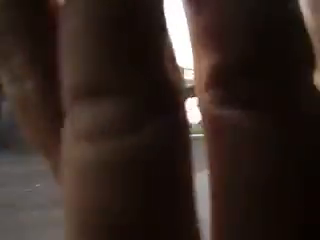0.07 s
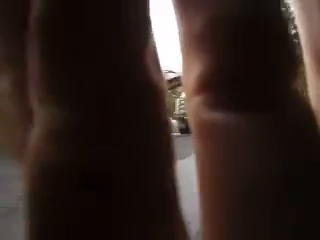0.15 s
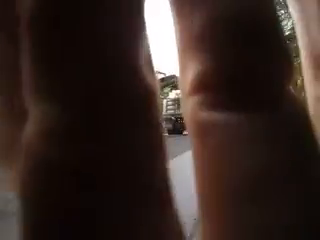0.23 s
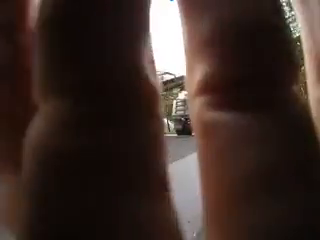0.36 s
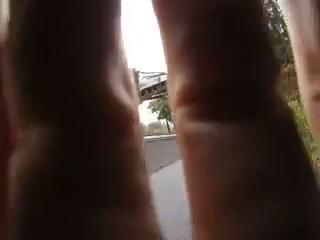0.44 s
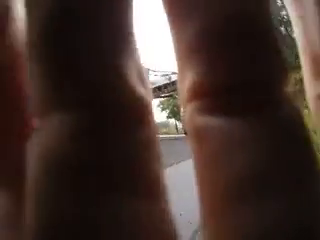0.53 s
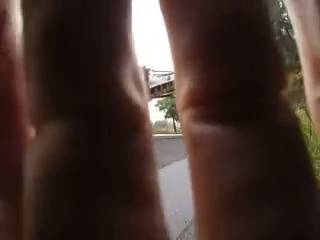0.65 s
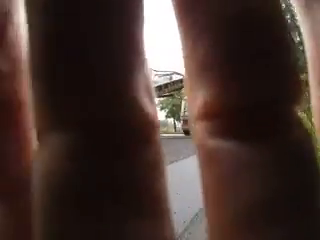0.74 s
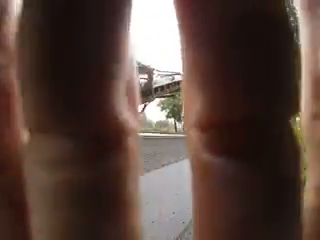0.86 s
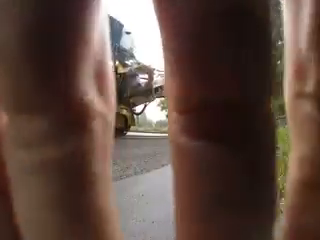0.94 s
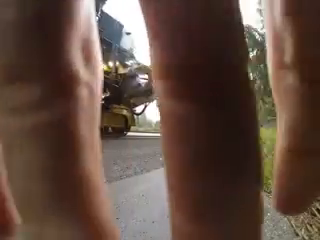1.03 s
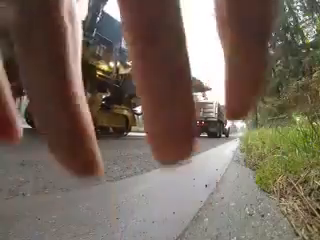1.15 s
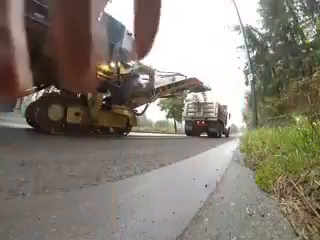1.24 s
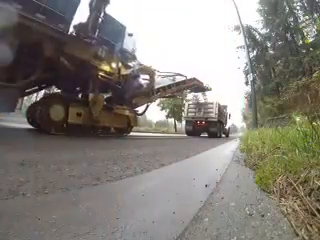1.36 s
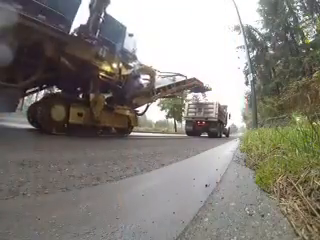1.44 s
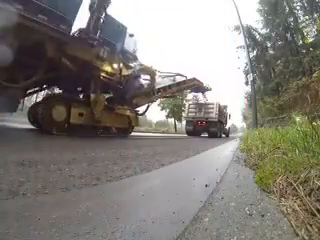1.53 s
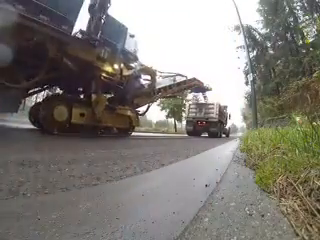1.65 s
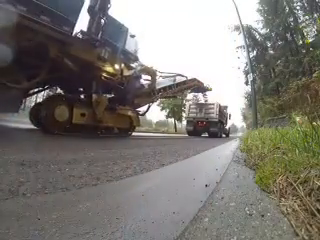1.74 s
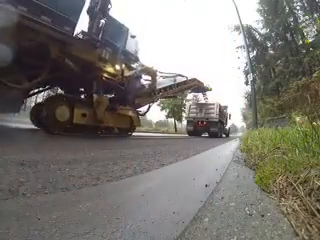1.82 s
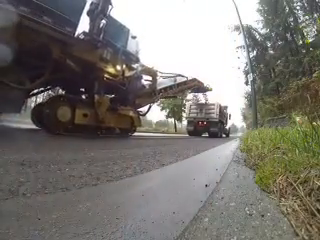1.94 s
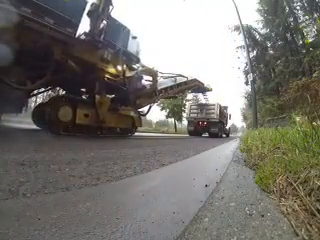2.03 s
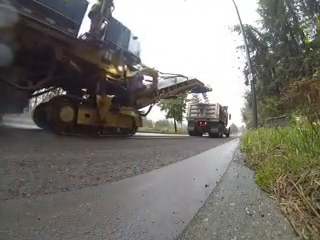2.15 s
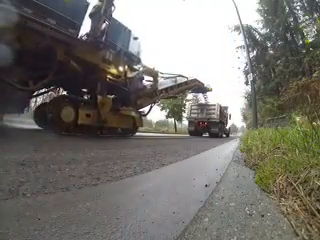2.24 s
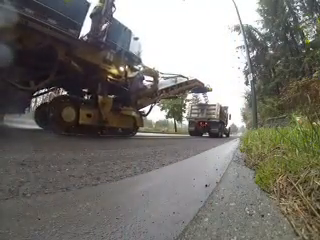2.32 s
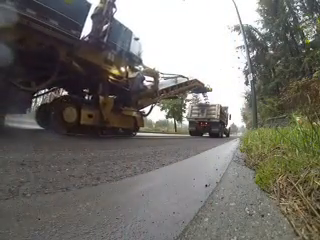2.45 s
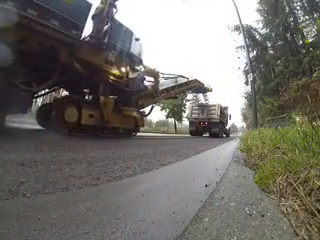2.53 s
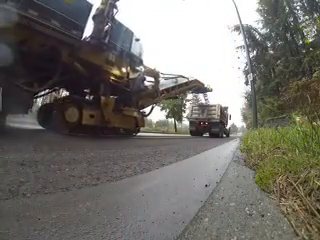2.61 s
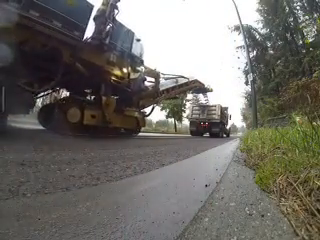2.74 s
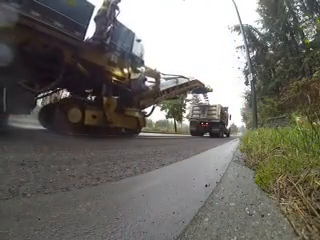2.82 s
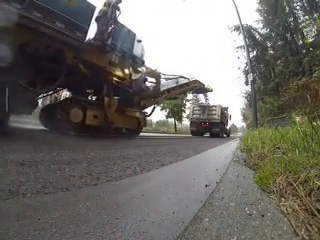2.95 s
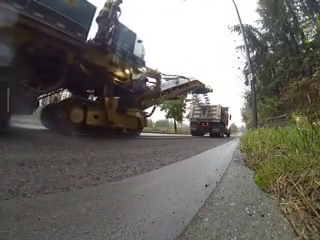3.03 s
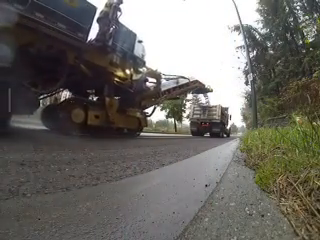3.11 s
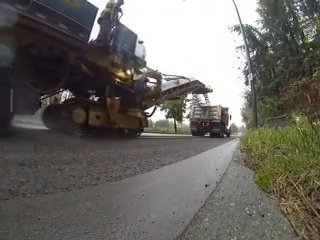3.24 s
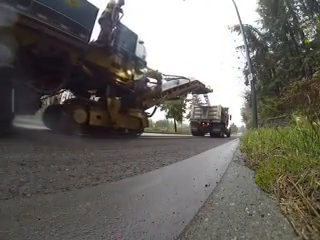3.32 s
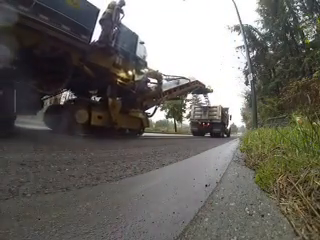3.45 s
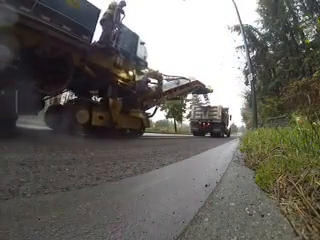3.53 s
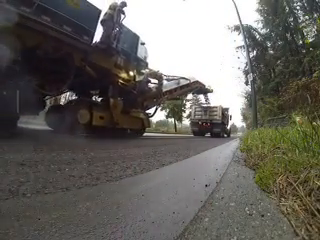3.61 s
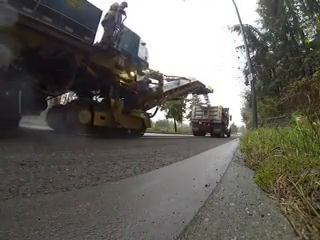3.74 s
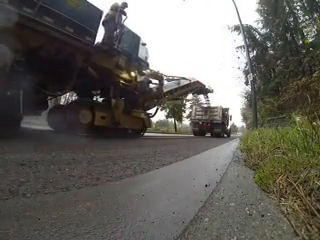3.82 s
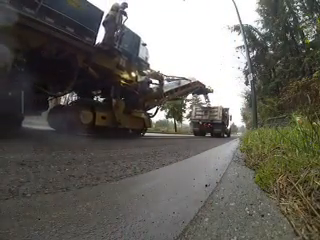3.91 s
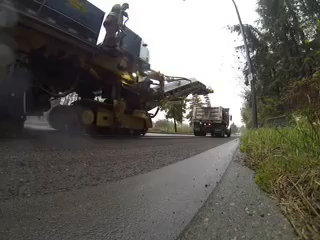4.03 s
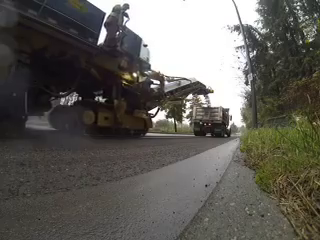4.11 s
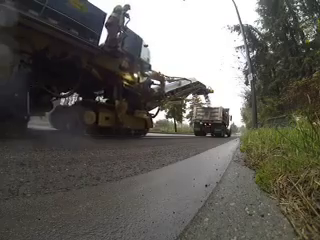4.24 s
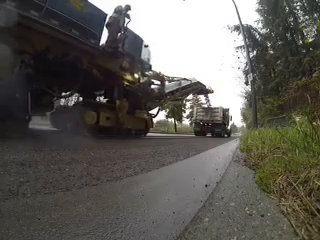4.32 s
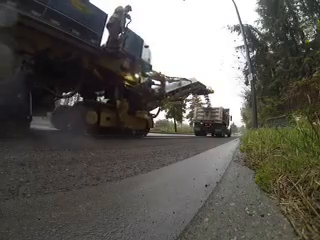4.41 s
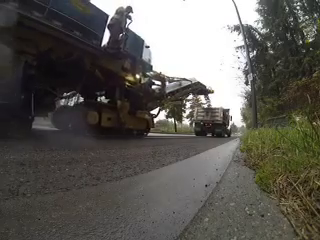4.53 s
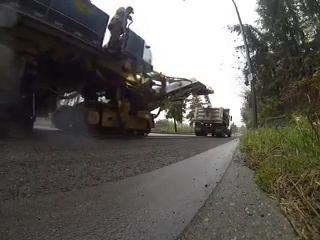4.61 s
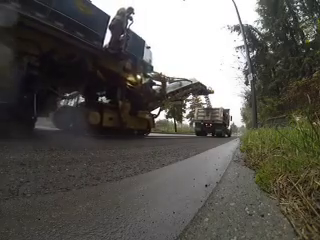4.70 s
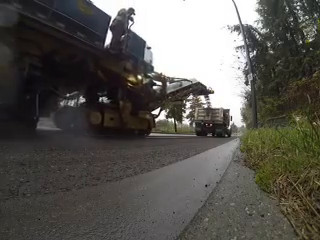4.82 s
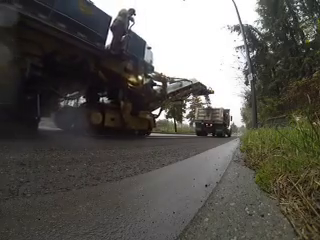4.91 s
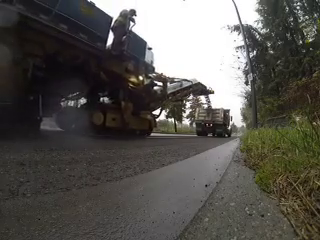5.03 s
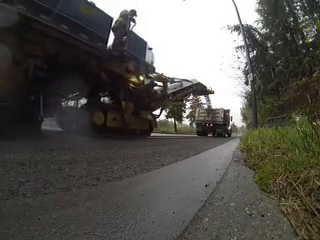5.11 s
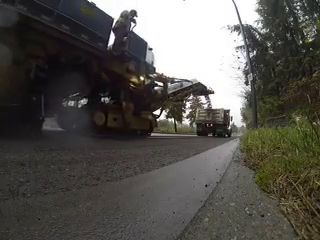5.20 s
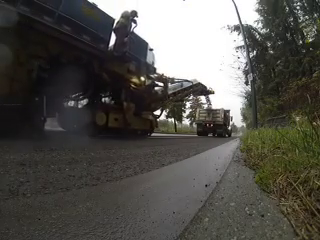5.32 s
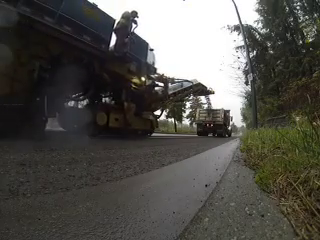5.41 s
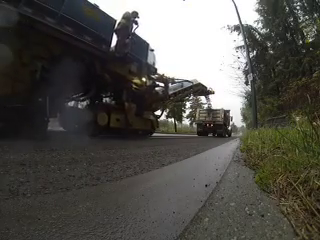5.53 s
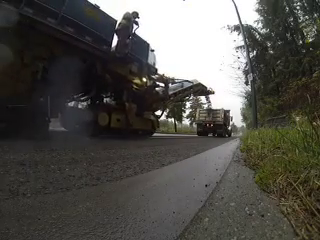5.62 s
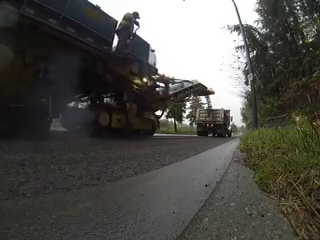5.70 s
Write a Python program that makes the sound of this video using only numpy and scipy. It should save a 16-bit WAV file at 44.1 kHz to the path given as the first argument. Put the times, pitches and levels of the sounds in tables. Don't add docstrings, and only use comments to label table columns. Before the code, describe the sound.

A large diesel road milling machine works a few metres from a small microphone sealed in a plastic case on the kerb, outdoors. From 0 to 0.28 seconds its roar is muffled and coloured by a covering hand. At 0.29 the case knocks down with a hard plastic clack and low thump; light pats follow, then a short finger drag and knocks around 0.4-0.46, and a last hard cluster near 0.57. The machine ducks after the knocks, is quietest around 0.7, and swells back to full by 2. From there it is continuous: rapid engine clatter with a boxy, nasal ring, wavering gear whine, rough asphalt grinding and dull hiss. Irregular low booms shudder underneath, several per second. The grinding bites harder around 2.5-3.2, eases near 5, and rises at the end. Tiny high grit ticks appear near 1.2, 3.0, 3.4 and 4.9; a very faint squeak comes at 5.0-5.15.

```python
import sys
import numpy as np
from scipy import signal
from scipy.fft import rfft, irfft
from scipy.io import wavfile
from scipy.ndimage import uniform_filter1d

SR = 44100
rng = np.random.default_rng(int(sys.argv[2]) if len(sys.argv) > 2 else 0)


def undo_db(level):
    steps = np.asarray(level, float) / 20
    return 10 ** steps


def materialize(psi):
    bounded = np.clip(np.atleast_2d(psi).T, -1, 1)
    quanta = np.round(bounded * 32767).astype(np.int16)
    wavfile.write(sys.argv[1], SR, quanta)


N = 254016
T = np.arange(N) / SR

# (time [s], level [dB])
OPEN = [
    (0, -5.5),
    (.14, -4),
    (.26, -3),
    (.46, -7),
    (.7, -8.5),
    (1.0, -6.5),
    (1.4, -2.5),
    (1.7, -1),
    (2.0, -0.5),
    (5.76, 0.5),
]
# (time [s], length [s], pitch [Hz], level [dB])
SWELLS = [(0.715, 0.055, 107.7, -24.5), (0.843, 0.075, 110.1, -24), (1.152, 0.11, 125, -18.5),
          (1.34, 0.066, 118.6, -22), (1.497, 0.14, 124.3, -16), (1.66, 0.03, 119.4, -11.5),
          (1.856, 0.11, 115.2, -11.5), (2.02, 0.05, 115.1, -16), (2.153, 0.19, 112.3, -16.0),
          (2.355, 0.042, 120, -11.5), (2.48, 0.058, 113.3, -18), (2.571, 0.098, 124.8, -16.5),
          (2.67, 0.075, 121.4, -15.5), (2.837, 0.094, 113.1, -15), (2.999, 0.055, 118.7, -9.5),
          (3.17, 0.081, 123.7, -14.5), (3.29, 0.095, 122, -12), (3.53, 0.021, 120.8, -12),
          (3.603, 0.14, 120.9, -14.5), (3.832, 0.079, 126, -12), (3.96, 0.037, 122.3, -15),
          (4.079, 0.11, 115, -12), (4.179, 0.037, 121, -11.5), (4.273, 0.06, 113, -15),
          (4.454, 0.12, 113.8, -13.0), (4.78, 0.19, 113, -13.5), (5.01, 0.13, 115.3, -13),
          (5.174, 0.06, 121.5, -14.5), (5.433, 0.23, 118.1, -12), (5.75, 0.09, 122.4, -13)]


def level(x):
    return x / np.sqrt(np.mean(x ** 2))


def curve(table):
    return np.interp(T, *np.transpose(table))


def bump(s, length_s):
    return np.exp(-np.log(2) * np.square(2 * (T - s) / length_s))


def walk(rate_hz):
    k = int(SR / rate_hz)
    steps = np.repeat(rng.standard_normal(N // k + 1), k)
    return level(uniform_filter1d(uniform_filter1d(steps, k), k)[:N])


def colour(x, table):
    hz, db = np.transpose(table)
    log_f = np.log(np.arange(1, N // 2 + 2) * SR / N)
    outside = np.maximum(np.log(hz[0]) - log_f, 0) + np.maximum(log_f - np.log(hz[-1]), 0)
    gain_db = np.interp(log_f, np.log(hz), db) - 69 * outside
    return level(irfft(rfft(x) * undo_db(gain_db), N))


def ring(push, modes):
    out = 0
    for hz, db, t60_s in modes:
        pole = np.exp(2j * np.pi * hz / SR - np.log(1000) / (t60_s * SR))
        out = out + undo_db(db) * signal.lfilter([1], [1, -pole], push).imag
    return out


def strike(s, db, push, modes, grain=1):
    hits = np.zeros(N)
    hits[(np.asarray(s) * SR).astype(int)] = undo_db(db)
    return ring(grain * np.convolve(hits, push)[:N], modes)


def engine(memory, depth_db, uneven_db):
    cycle_samples, cylinders = 2389, 8
    fresh = rng.standard_normal((N // cycle_samples + 41, cycle_samples))
    repeat = signal.lfilter([1], [1, -min(memory, .99)], fresh, axis=0)[40:].ravel()[:N]
    turn = np.arange(N) % cycle_samples * cylinders / cycle_samples
    size = undo_db(uneven_db * rng.standard_normal(cylinders))[turn.astype(int)]
    return level(repeat), level(size * undo_db(-depth_db * (turn % 1)))


def stones(flicker_db, rate_hz):
    return rng.standard_normal(N) * undo_db(flicker_db * walk(rate_hz))


def shocks():
    power = sum(undo_db(2 * db) * bump(at, length_s) for at, length_s, _, db in SWELLS)
    return power + undo_db(2 * (-31 + curve(OPEN)))


def boom(power, width_hz, steady_s):
    s, _, hz, _ = np.transpose(SWELLS)
    lowpass = signal.butter(2, width_hz, fs=SR, output="sos")
    sway = signal.sosfilt(lowpass, [1, 1j] @ rng.standard_normal((2, N)))
    sway = sway / np.sqrt(uniform_filter1d(np.abs(sway) ** 2, int(steady_s * SR)))
    carrier = np.exp(2j * np.pi * np.cumsum(np.interp(T, s, hz)) / SR)
    return np.sqrt(2 * power) * (sway * carrier).real


def gears(wobble, drift, held):
    # (frequency [Hz], rms level [dB])
    mesh_tones = [(47.1, -42), (849.2, -53), (1040, -50), (1070.6, -49), (1273.8, -37), (1366, -35),
                  (1495.3, -38), (2088.7, -55), (2417.5, -56), (2611.5, -44), (2654.6, -48), (2701, -52),
                  (2749.5, -50), (2797, -35), (2843, -47), (2891, -57), (2938, -55), (2986.5, -49),
                  (3131, -53), (3177, -59), (3222.5, -57), (3318, -58), (3417.5, -56), (3656, -51),
                  (3795, -59), (4174, -57), (4550, -59), (5112, -60), (5222, -62)]
    # (time [s], length [s], depth [dB])
    fades = [
        (1.15, 0.23, 7.5),
        (2.8, 0.22, 5),
        (3.62, 0.26, 5.5),
        (4.1, 0.34, 2.5),
        (5.42, 0.4, 2.5),
    ]
    whine_db, whine_per_open = 2, 1
    clock_s = np.cumsum(1 + wobble * np.sin(2 * np.pi * 2.05 * T) + drift * walk(9)) / SR
    tones = 0
    for hz, db in mesh_tones:
        waver_db = 1.9 * walk(14) + 2.5 * (db < -38) * walk(1.5)
        palm_db = 11 * held * (4300 < hz < 5000)
        tones = tones + undo_db(db + waver_db + palm_db) * np.sin(2 * np.pi * (hz * clock_s + rng.random()))
    fade_db = sum(db * bump(s, length_s) for s, length_s, db in fades)
    return np.sqrt(2) * tones * undo_db(whine_db + whine_per_open * curve(OPEN) - fade_db)


def machine():
    # (frequency [Hz], density [dB per Hz])
    rumble_shape = [(18, -42), (36, -17.5), (70, -16), (100, -8), (118, -14), (135, -6.5), (190, -15.5),
                    (214, -7.5), (236, -14), (262, -13), (295, -22.5), (469, -23.5), (764, -40),
                    (1000, -41)]
    clatter_shape = [(470, -17), (800, -18.5), (952, -17), (1030, -15), (1120, -13), (1240, -1.5),
                     (1390, 0.5), (1540, -1.5), (1990, -26), (2150, -36), (2800, -46), (4730, -120)]
    grind_shape = [(1900, -46), (2100, -7), (2300, -4.5), (2500, -6.5), (2790, 2), (3000, -4.5),
                   (3250, -10.5), (3600, -5), (4000, -14.5), (4250, -13.5), (4450, -17.5), (4920, -3.5),
                   (5400, -19), (6300, -25)]
    hiss_shape = [(3350, 1), (5700, -1), (6940, -7.5), (7810, -4), (9180, -13), (9970, -11), (11300, -14),
                  (12300, -21), (13800, -17.5), (14600, -27)]
    # (frequency [Hz], density [dB per Hz])
    held_low = [(11, -30), (18, 3.5), (49, -5), (65, -6.5), (189, -10), (220, -7.5), (248, -11.5),
                (510, -17), (668, -29), (1000, -28), (1300, -50), (2200, -120)]
    held_high = [(1120, -48), (1900, -16), (2050, -8.5), (2670, -2), (2710, -8), (2900, -2), (3160, -26),
                 (3540, -3.5), (3870, -19), (4700, -15), (4770, -23), (5130, -15), (6500, -29), (8450, -61),
                 (14300, -120)]
    # (time [s], level [dB])
    bite = [
        (0, 0),
        (2.1, 0),
        (2.45, 1.5),
        (2.75, 3),
        (3.27, 1),
        (3.55, 0),
        (4.5, -.5),
        (5.0, -1.5),
        (5.55, 0),
        (5.76, 1.5),
    ]
    set_down_s = 0.276
    open_db, bite_db = curve(OPEN), curve(bite)
    rumble_db = -26 + 1.32 * open_db
    clatter_db = -22 + open_db + bite_db
    grind_db = -34.5 + 1.09 * open_db + .7 * bite_db
    repeat, gate = engine(memory=.94, depth_db=7.0, uneven_db=3.0)
    held = np.clip((set_down_s - T) / .01, 0, 1)
    load = undo_db(.75 * walk(9))

    shake = stones(0.91, 12)
    scrape = gate ** 0.24 * (0.28 * repeat + stones(0.85, 40))
    rumble = held * undo_db(4.5) * colour(shake, held_low) + (1 - held) * undo_db(6.0) * colour(shake, rumble_shape)
    power = shocks()
    rumble = rumble * (power / uniform_filter1d(power, size=SR // 2)) ** 0.072
    clatter = colour(gate ** 0.11 * (0.65 * repeat + 0.75 * stones(0.59, 30)), clatter_shape)
    grind = held * undo_db(2) * colour(scrape, held_high) + (1 - held) * undo_db(0.5) * colour(scrape, grind_shape)
    hiss = colour(gate ** 0.12 * stones(0.53, 45), hiss_shape)

    body = undo_db(rumble_db) * rumble + undo_db(clatter_db + 0.26) * clatter
    body = body + undo_db(grind_db) * (grind + undo_db(-11.5) * hiss)
    shaken = boom((1 - held) * power, width_hz=8.94, steady_s=0.059)
    return load * body + shaken + gears(0.0008, 0.00063, held)


def soft_push(push_s):
    return np.hanning(int(push_s * SR)) * 2 / (push_s * SR)


def knocks():
    # (time [s], ring level [dB], edge level [dB])
    wall_hits = [(.2875, .5, -7), (.288, -14, -14), (.403, -15, -19), (.4185, -11, -19), (.4372, -1.5, -14),
                 (.4505, -7, -17), (.459, -19, -18), (.5625, -12, -9), (.565, -14, -16), (.568, -12, -16),
                 (.573, -7, -3), (.594, -31, -29)]
    # (time [s], level [dB])
    pats = [
        (.337, -25),
        (.349, -32),
        (.365, -25),
        (0.4499, -17),
        (.461, -22),
        (0.5637, -10.5),
        (.567, -9),
        (.573, -5),
    ]
    # (time [s], level [dB])
    shell_hits = [
        (.431, -25),
        (.4372, -22),
        (.4505, -24),
        (.461, -15),
        (.562, -23),
        (.570, -20),
    ]
    # (time [s], level [dB])
    jolts = [
        (0.2854, -9),
        (0.437, -16),
        (.451, -12),
        (.567, -9),
    ]
    # (frequency [Hz], level [dB], t60 [s])
    wall_modes = [(1290, 0, .035), (1480, -9, .025)]
    edge_modes = [(1870, 1.5, 0.013), (2345, -0.5, 0.011), (3330, -12, 0.02), (4230, -31, 0.013),
                  (5500, -45, .01), (8340, -30, 0.0066)]
    pat_modes = [(167, -14, 0.026), (325, -15, 0.049), (408, 11.5, 0.035)]
    shell_modes = [(292, 0, .16)]
    thump_modes = [(66.6, -2.5, 0.09), (95, 0, 0.16)]
    s, ring_db, edge_db = np.transpose(wall_hits)
    slips = rng.standard_normal(N)

    drag_s, drag_db = (.404, .438), (-22, -5)
    drag = undo_db(np.interp(T, drag_s, drag_db, left=-120, right=-120) - 15) * slips * (rng.random(N) < .02)
    drag = np.convolve(drag, soft_push(.00016))[:N]

    wall = strike(s, ring_db, soft_push(.0004), wall_modes)
    wall = wall + strike(s, edge_db, 4 * soft_push(.0035), edge_modes, slips)
    wall = wall + ring(drag, wall_modes) + undo_db(-8) * ring(drag, edge_modes)
    wall = signal.sosfilt(signal.butter(2, 950, "high", fs=SR, output="sos"), wall)
    hollow = strike(*np.transpose(pats), soft_push(.0035), pat_modes)
    hollow = hollow + strike(*np.transpose(shell_hits), soft_push(.003), shell_modes)
    return wall + hollow + strike(*np.transpose(jolts), soft_push(0.0032), thump_modes)


def duck(release_s):
    # (time [s], depth [dB])
    dips = [
        (0.2878, 13.5),
        (.4372, -1.5),
        (.4505, 5.5),
        (.568, -0.5),
        (.573, 5),
    ]
    dip_db = sum(db * (T > s + .004) * np.exp(-np.maximum(T - s, 0) / release_s) for s, db in dips)
    return undo_db(-uniform_filter1d(dip_db, size=130))


def grit():
    # (time [s], peak [dB], pitch [Hz])
    ticks = [
        (0.7253, -69, 14000),
        (1.1872, -50, 14010),
        (1.532, -59, 13700),
        (3.04, -49, 13600),
        (3.386, -48, 13900),
        (3.9649, -57, 13960),
        (4.8918, -46, 13900),
        (4.9074, -52, 14020),
        (5.1208, -55, 12600),
        (5.2725, -55, 12200),
    ]
    # (time [s], pitch [Hz], level [dB])
    squeak = [
        (5.0, 14800, -74),
        (5.06, 14600, -70),
        (5.15, 14400, -73),
    ]
    s, hz, db = np.transpose(squeak)
    squeak_phase = 2 * np.pi * np.cumsum(np.interp(T, s, hz)) / SR
    out = undo_db(np.interp(T, s, db, left=-120, right=-120)) * np.sin(squeak_phase)
    t = T[:1000]
    for s, db, hz in ticks:
        rough = .06 * np.cumsum(rng.standard_normal(len(t)))
        at = int(s * SR)
        envelope = t / .002 * np.exp(-t / .002)
        out[at:at + len(t)] += undo_db(db + 6) * envelope * np.sin(2 * np.pi * hz * t + rough)
    return out


def scene():
    return (machine() * duck(release_s=0.12) + knocks() + grit())[None]


def top_cut(x):
    return signal.sosfilt(signal.butter(12, 15390, fs=SR, output="sos"), x)


def record(dry):
    soft = 1.424 * np.tanh(dry / 1.339)
    return top_cut(np.clip(soft, -1, 1))


dry = scene()
out = record(dry)
materialize(out)
```